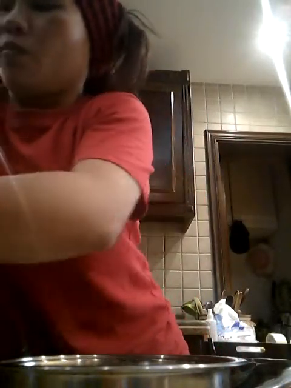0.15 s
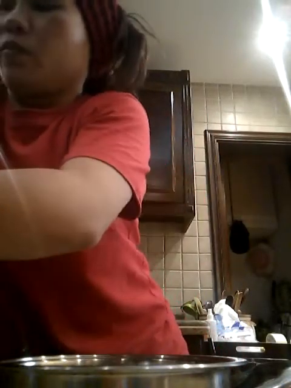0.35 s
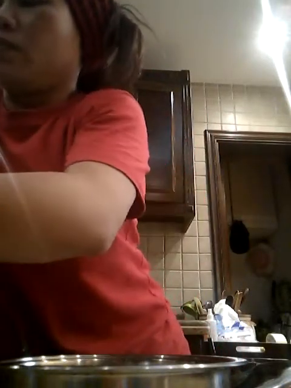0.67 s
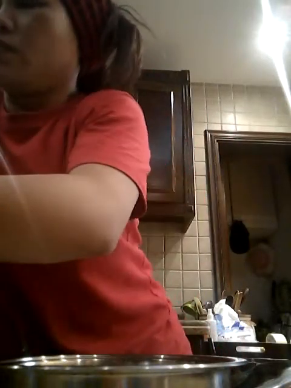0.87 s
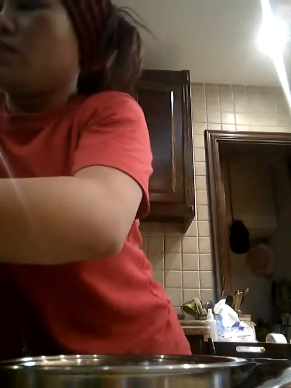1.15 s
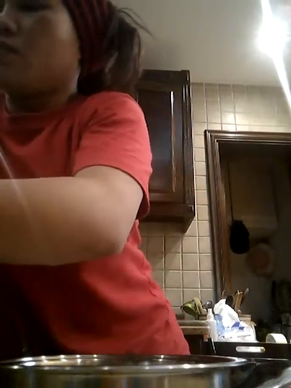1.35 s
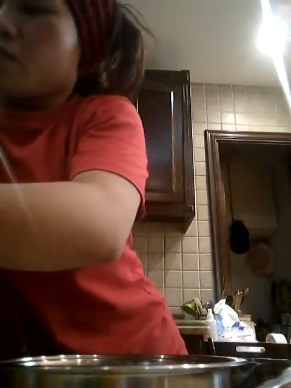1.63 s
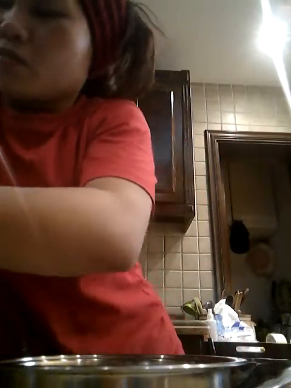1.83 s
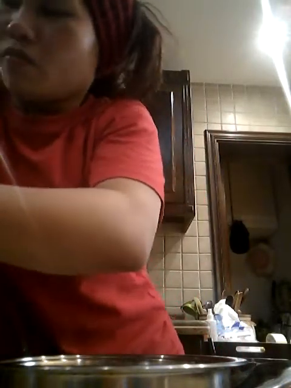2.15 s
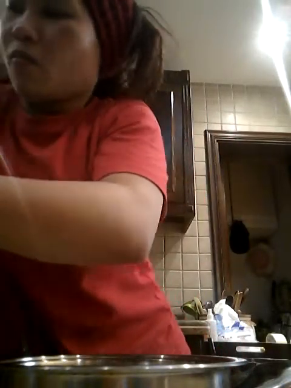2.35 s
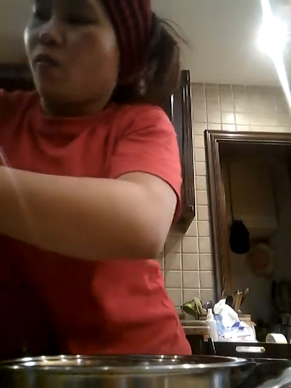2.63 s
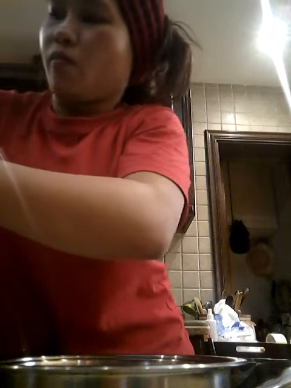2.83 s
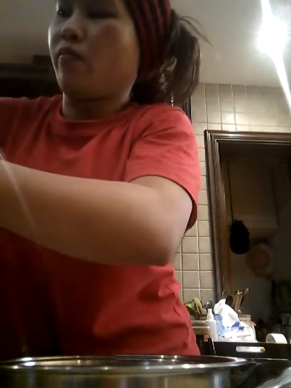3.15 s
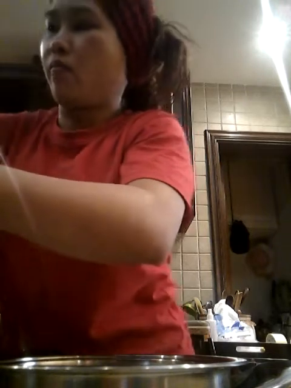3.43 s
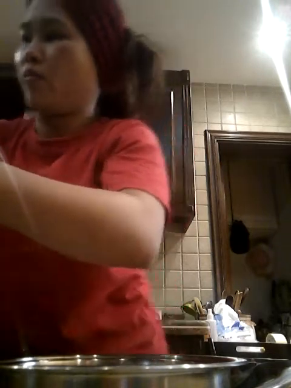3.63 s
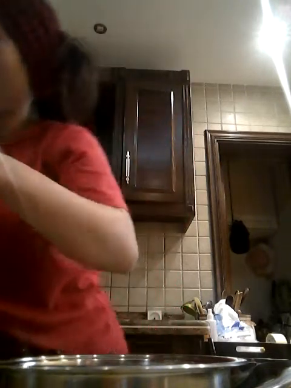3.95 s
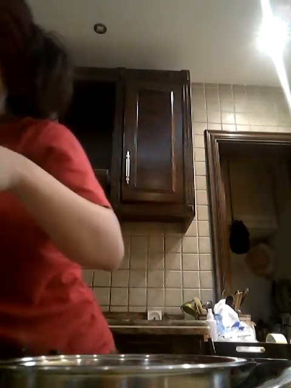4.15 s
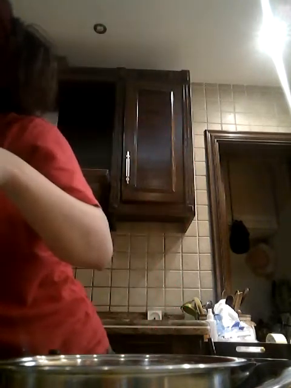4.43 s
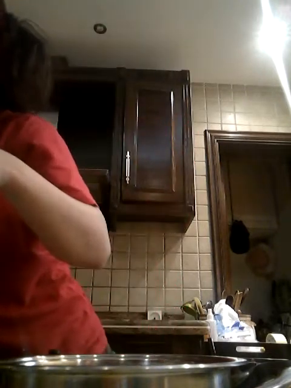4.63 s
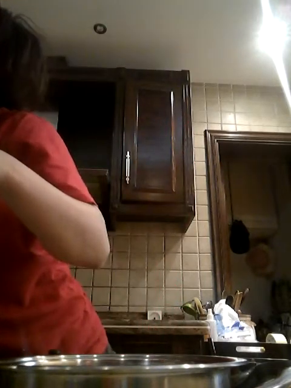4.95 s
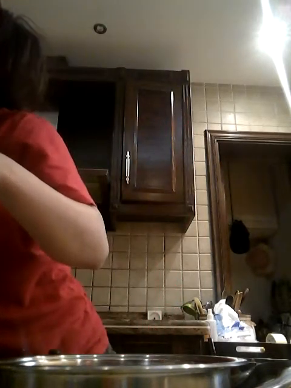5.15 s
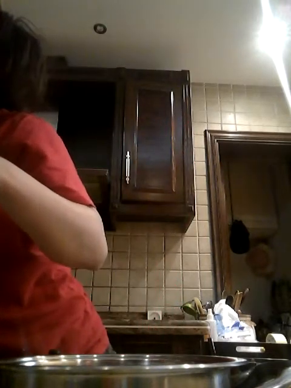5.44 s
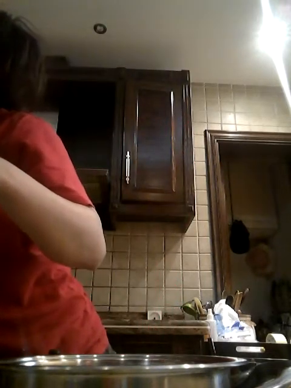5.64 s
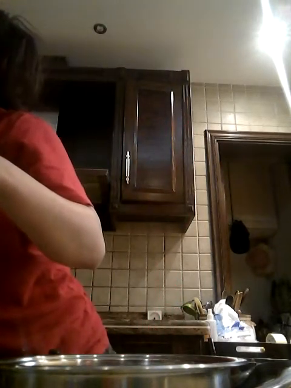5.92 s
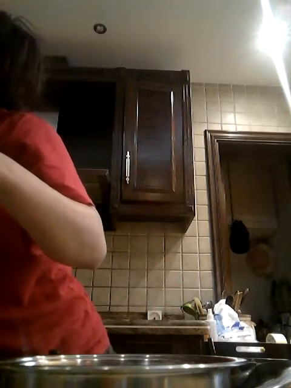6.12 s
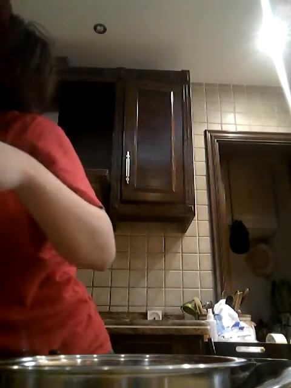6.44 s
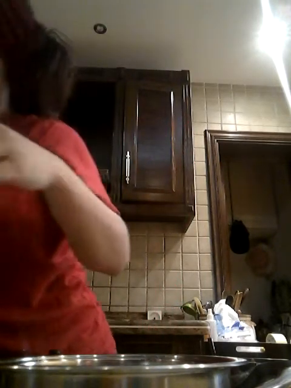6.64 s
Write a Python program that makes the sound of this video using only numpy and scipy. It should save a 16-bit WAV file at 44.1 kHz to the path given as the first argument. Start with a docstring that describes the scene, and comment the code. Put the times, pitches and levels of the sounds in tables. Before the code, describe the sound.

Close steel clinks, dry rustling scoops and dull knocks in a tiled kitchen, with a thin pot wall briefly singing after harder blows.

```python
"""A steel cup in a small tiled kitchen, over a soft low rumble, faint whines and hiss (shaped noise).
Dry goods rustle in the sliding cup (patchy noise and a narrow-band hum). Early on, ringing taps and dry clacks
alternate, then come dense metallic clinks and clacks (damped modes and a noise burst); dull knocks are further off.
After some blows the pot's thin wall sings on in beating modes, and a spoon jolts once (bright modes).
Late on, two stronger dull knocks stand out."""
import sys
import numpy as np
from scipy import signal
from scipy.fft import rfft, irfft, next_fast_len
from scipy.io import wavfile
from scipy.ndimage import uniform_filter1d

SR = 44100
rng = np.random.default_rng(int(sys.argv[2]) if len(sys.argv) > 2 else 0)


def dump(signal):
    """Clip the signal to [-1, 1] and save it as 16-bit WAV at the path in sys.argv[1]."""
    limited = np.clip(np.atleast_2d(signal).T, -1, 1)
    pcm = np.round(limited * 32767).astype(np.int16)
    wavfile.write(sys.argv[1], SR, pcm)


N = 298998  # samples


def amp(db):
    """Level to amplitude: 20 dB is a factor of ten."""
    return 10 ** (np.asarray(db) / 20)


def unit(x):
    """Normalisation: scale x to an rms of 1."""
    return x / np.sqrt(np.mean(x ** 2) + 1e-20)


def along(points, hz):
    """Logarithmic pitch scale: interpolate (frequency [Hz], value) points on a log axis."""
    point_hz, values = np.transpose(points)
    return np.interp(np.log(hz + 1), np.log(point_hz + 1), values)


def filtered(x, response):
    """Linear filtering: multiply the spectrum of x by a response of frequency."""
    size = next_fast_len(N + 8192)
    spectrum = rfft(x, size) * response(np.fft.rfftfreq(size, 1 / SR))
    return irfft(spectrum, size)[..., :N]


def noise(spectrum, patchy_db):
    """Coloured noise: a random signal with patches of random gain in time and frequency, at rms 1."""
    cells = signal.stft(rng.standard_normal(N + 512), nperseg=512)[2]
    patches = uniform_filter1d(rng.standard_normal(cells.shape), 5, 0)
    patches = unit(uniform_filter1d(patches, 8, 1))
    patchy = signal.istft(cells * amp(patchy_db * patches), nperseg=512)[1][:N]
    return unit(filtered(patchy, lambda hz: amp(along(spectrum, hz))))


def narrow(bands):
    """Resonance: noise in (centre [Hz], width [Hz], level [dB]) bands, each at its own rms level."""
    def response(f):
        total = 0
        for hz, width, db in bands:
            rms_gain = np.sqrt(SR * width / np.pi) / 2 / np.sqrt(2)
            total = total + amp(db) * rms_gain / (width / 2 + 1j * (f - hz))
        return total
    return filtered(rng.standard_normal(N), response)


def ring(hz, db, t60, seconds, rise, swell=1):
    """Modal decay: exponentially damped sines, at slightly new strengths for every blow."""
    t = np.arange(int(seconds * SR)) / SR
    db = db + 1.5 * rng.standard_normal(len(hz))
    decay_db = -60 * t / np.maximum(t60, .003)[:, None]
    modes = amp(db[:, None] + decay_db) * np.sin(2 * np.pi * np.outer(hz, t))
    onset = 1 - np.exp(-t / max(rise, 1e-4))
    return (modes * swell).sum(0) * onset


# Reverberation of the tiled kitchen: (frequency [Hz], t60 [s])
KITCHEN_DECAY = [(150, 0.17), (600, 0.36), (1500, 0.34), (4000, 0.39), (8000, .3), (14000, 0.23)]


def add(out, s, sound, room_db):
    """Room response: decaying diffuse noise; the source moves, so each answer is new."""
    hz, t, cells = signal.stft(rng.standard_normal(SR // 2), SR, nperseg=256)
    decay_db = -60 * t / along(KITCHEN_DECAY, hz)[:, None]
    tail = signal.istft(cells * amp(decay_db), SR, nperseg=256)[1]
    # echoes thicken over the first milliseconds
    tail = tail * (1 - np.exp(-np.arange(len(tail)) / (0.0033 * SR)))
    heard = amp(room_db) * signal.fftconvolve(sound, tail / np.linalg.norm(tail))
    heard[:len(sound)] += sound
    part = out[round(s * SR):][:len(heard)]
    part += heard[:len(part)]


# Course of the low rumble, swelling with the room's low boom around the hits: (time [s], level [dB])
RUMBLE_COURSE = [(0.0, -65.5), (0.34, -62), (0.73, -61.5), (1.02, -58.5), (1.75, -57), (2.08, -64),
                 (2.5, -65), (2.66, -49.5), (3.44, -49.5), (3.52, -54), (3.91, -61.5), (4.148, -66.5),
                 (4.21, -52), (4.36, -41), (4.65, -63), (5.5, -65), (5.85, -61.5), (6.78, -64)]
# Colour of the low rumble: (frequency [Hz], relative level per Hz [dB])
RUMBLE_COLOUR = [(15, -59), (25, -34), (102, -6), (143, -22), (167, -5.5), (261, -5), (295, -9.5),
                 (394, -7), (422, -10), (1500, -22.5), (1950, -54), (3300, -120)]
# Colour of the hiss: (frequency [Hz], relative level per Hz [dB])
HISS_COLOUR = [(530, -26), (900, -0.5), (1050, -13), (1770, -14), (1900, -6.5), (2330, -7), (2960, -10.5),
               (3470, -9.5), (3770, -16), (6030, -18.5), (6560, -15), (7680, -20.5), (16000, -20.5)]
# Faint steady whines: (frequency [Hz], width [Hz], level [dB])
WHINE_BANDS = [(3460, 30, -80), (6330, 250, -80.5)]


def background():
    """Stationary and modulated noise: a soft low rumble that swells, faint whines and steady hiss."""
    times, levels_db = np.transpose(RUMBLE_COURSE)
    rumble_gain = amp(np.interp(np.arange(N) / SR, times, levels_db))
    rumble = rumble_gain * noise(RUMBLE_COLOUR, patchy_db=1)
    hiss = amp(-73.5) * noise(HISS_COLOUR, patchy_db=-1.3)
    return rumble + hiss + narrow(WHINE_BANDS)


# Swishes of dry goods as the cup slides:
# (time of peak [s], rustle level [dB], hum level [dB], rise per 20 dB [s], fall per 20 dB [s])
SLIDES = [(.05, -72, -72.5, .5, 0.65), (.38, -65.5, -76.5, 0.3, 0.52), (.7, -64, -62, .25, 0.13),
          (0.802, -66, -60.5, 0.086, 0.32), (1.0, -51, -66.5, 0.0092, 0.18), (1.6, -67.5, -70.5, .45, 0.74),
          (1.86, -58.5, -70.5, .3, 0.25), (2.28, -62, -73, .12, 0.19), (2.45, -67, -66.5, 0.071, .9),
          (3.15, -48, -55.5, 0.39, 0.19), (3.4, -63.5, -66.5, 0.48, 2.2), (3.858, -61.5, -73.5, .2, 0.08),
          (4.18, -50, -55, 0.028, 0.41), (5.649, -61, -65, .07, 0.35), (5.79, -63.5, -75, 0.15, 0.065),
          (5.92, -63.5, -85.5, .08, 0.38), (6.519, -72.5, -89.5, .25, 1.5)]
# Colour of the sliding grains: (frequency [Hz], relative level per Hz [dB])
GRAIN_COLOUR = [(800, -39), (2000, -11), (4000, -4.5), (6000, -6), (7800, -2), (10000, -12.5),
                (12500, -17.5), (16000, -31.5)]


def rustle():
    """Friction noise: grains slide on steel, and the sliding cup hums faintly on its own modes."""
    time = np.arange(N) / SR
    swells = []
    for peak, _, _, rise, fall in SLIDES:
        swells.append(amp(-20 * np.maximum((peak - time) / rise, (time - peak) / fall)))
    # overlapping slides add in power
    powers = amp(np.transpose(SLIDES)[1:3]) ** 2
    rustle_gain, hum_gain = np.sqrt(powers @ np.array(swells) ** 2)
    # uneven grain strikes
    strikes_db = np.minimum(4 * rng.exponential(size=N // 40 + 1), 12)
    grains = uniform_filter1d(amp(strikes_db).repeat(40)[:N], 30)
    hiss = unit(noise(GRAIN_COLOUR, patchy_db=1.5) * (1 + .15 * grains))
    hum = unit(narrow([(1490, 14, 2.5), (2340, 29, -5.5), (4500, 36, -7.0), (6100, 80, -10.0), (8340, 80, -7.5)]))
    return rustle_gain * hiss + hum_gain * hum


def crash(colour, t60):
    """Modal overlap: the contact's many short-lived modes blur into a burst of coloured noise."""
    size = SR // 10
    spectrum = rfft(rng.standard_normal(size)) * amp(along(colour, np.fft.rfftfreq(size, 1 / SR)))
    return irfft(spectrum) * amp(-60 * np.arange(size) / SR / t60)


# Modes of the worktop: (frequency [Hz], relative level [dB], t60 [s])
WORKTOP_MODES = [(136, -12, 0.042), (195, 0, 0.06), (241, -6, 0.13), (297.4, 7, 0.05), (374, -2.5, 0.15),
                 (622, -5.5, 0.015)]
# Centres of the upper mode families of the cup: (frequency [Hz])
FAMILY_CENTRES = [2400, 3300, 4400, 6000, 8100, 10500]


def clatter(contacts, modes, family_db, ring_db, ring_loss, crash_t60):
    """Impact excitation: contact hardness tilts the upper modes, the spot struck sets the middle family."""
    out = np.zeros(N)
    hz, db, share = np.transpose(modes)
    low_hz, low_db, low_t60 = np.transpose(WORKTOP_MODES)
    octaves = np.log2(np.array(FAMILY_CENTRES) / 4400)
    for s, thud_db, clunk_db, bowl_db, upper_db, tilt_db, spot_db, damping, crash_db in contacts:
        families_db = upper_db + tilt_db * octaves + family_db + spot_db * (octaves == 0)
        upper = list(zip(FAMILY_CENTRES, families_db))
        top_db = families_db[-1]
        struck_db = along([(880, clunk_db), (1500, bowl_db)] + upper, hz)
        struck_db = struck_db + (ring_db - ring_loss * crash_db) * (hz > 2000)
        contact = ring(hz, db + struck_db, share * damping, .3, rise=.0001)
        # the worktop thuds below
        contact[:len(contact) // 2] += ring(low_hz, low_db + thud_db - 6, low_t60, .15, rise=0.0002)
        colour = [(200, clunk_db - 21.0), (800, clunk_db + 12.5)] + upper
        colour = colour + [(12000, top_db - 15.0), (16000, top_db - 19)]
        contact[:SR // 10] += amp(crash_db) * crash(colour, crash_t60)
        add(out, s, contact, room_db=-2.5)
    return out


# Ringing taps: (time [s], worktop thud [dB], clunk [dB], bowl mode [dB], upper modes [dB],
# their tilt [dB per octave], extra of the 4.4 kHz family for the spot struck [dB], damping time [s],
# crash relative to its colour [dB]); the levels are relative
RINGING_TAPS = [(0.1946, -35, -58, -58, -39.5, -0.3, -9, 0.025, 0),
                (0.403, -43, -70, -56.5, -46.5, 1.1, -12, 0.059, 5),
                (0.4486, -81, -73, -73, -58, 5, -11, 0.04, 8),
                (0.4848, -73, -72, -71, -56.5, -0.5, -6, 0.057, -8),
                (0.6589, -84, -47.5, -70, -65, -1, -4, 0.05, 6),
                (0.793, -64, -53, -60, -63, 7.5, 2, 0.043, 14),
                (0.832, -48, -64, -56, -60, 5, 2, 0.037, 10.5),
                (0.9921, -35, -19.5, -19, -26, -1.3, 2.5, 0.03, -5),
                (1.323, -35, -21, -8.5, -18.5, -5.5, 2.5, 0.069, 1),
                (1.4061, -35.5, -24, -10, -13.5, -3.5, -0.94, 0.049, -3.5),
                (2.4285, -59.5, -67, -60, -68, -0.8, -3.3, 0.046, -12)]
# Modes of the tapping cup: (frequency [Hz], relative level [dB], share of the damping time [1])
TAP_MODES = [(954, -3.5, .45), (1451, 3.5, 1.38), (2385, 2, 0.29), (2374, -0.5, 0.82), (3020, -1, 0.73),
             (3287, 1.5, 0.45), (4306, 4, 0.49), (6040, 7, 0.38), (7476, -7, 0.45), (8020, 4, 0.3),
             (8670, -5.5, 0.53), (10150, -4.5, .5), (13300, -9, .8)]
# How readily each mode family answers a tap: (relative level [dB])
TAP_FAMILIES = [1.5, -3, 2, 0, 0.5, -8.5]


def taps():
    """Damped free vibration: the hand-held cup rings cleanly at each tap."""
    return clatter(RINGING_TAPS, TAP_MODES, TAP_FAMILIES, ring_db=-0.4, ring_loss=0, crash_t60=.016)


# Dry clacks early, then dense clinks and clacks: (time [s], worktop thud [dB], clunk [dB], bowl mode [dB],
# upper modes [dB], their tilt [dB per octave], extra of the 4.4 kHz family for the spot struck [dB],
# damping time [s], crash relative to its colour [dB]); the levels are relative
CLINKS_AND_CLACKS = [(0.5898, -71.5, -79, -70, -54.5, -2, -1, 0.031, 7.7),
                     (1.1591, -43, -47.5, -52.5, -54, -4.5, -4, 0.032, 5),
                     (1.8197, -44, -52, -73.5, -38.5, 4.5, -2.5, 0.036, 7),
                     (2.4662, -53, -68.5, -65, -69, 6, -6, 0.023, 8),
                     (2.522, -21.5, -26, -8.5, -22, -8.5, -6.5, 0.076, 5.6),
                     (2.5701, -29.5, -20, -12.5, -34.5, -4, 2.5, 0.09, 4.2),
                     (2.7159, -33.5, -25.5, -19, -22.5, 0.7, 7.5, 0.075, 7),
                     (2.7266, -29.5, -25.5, -17, -26, -0.1, 5.5, 0.071, 7),
                     (2.7448, -45, -32.5, -32, -27.5, 4.5, 5.5, 0.059, 7.7),
                     (2.8, -45, -36.5, -34, -35.5, 2, 6, 0.025, 6.5),
                     (2.884, -45, -44, -49, -41, -9, -8, 0.031, 5.9),
                     (2.9698, -30.5, -28, -18, -25, 2.3, -2, 0.054, 5.5),
                     (2.9939, -25, -29, -26.5, -19.5, 1.1, 4.5, 0.031, 7),
                     (3.129, -52.5, -30, -37, -43, -2.5, -8.5, 0.13, 2.3),
                     (3.152, -35, -28.5, -32.5, -39.5, -1.6, -9.5, 0.055, 1.58),
                     (3.2887, -18.5, -29.5, -11.5, -21, 7, -0.2, 0.062, 1.5),
                     (3.299, -21, -34, -9.5, -21.5, 0, -3, 0.098, 3),
                     (3.317, -27.5, -30.5, -22, -27.5, -0.4, 8.5, 0.098, 4),
                     (3.4945, -10.5, -15.5, -13.5, -22.5, 3, -9, 0.043, 3.1),
                     (3.5159, -27.5, -34, -15.5, -29.5, 3.5, -5, 0.09, 2.57),
                     (4.1661, -52, -36.5, -36, -36, -1.5, 1, 0.03, 8.3),
                     (4.1741, -44, -37.5, -45.5, -39, 3.5, 1.5, 0.015, 3.9),
                     (4.1951, -32, -35, -58, -39, -2, 2.1, 0.088, 1.9),
                     (4.2108, -30, -25, -14.5, -32.5, -6.5, -4, 0.04, 5.7),
                     (4.286, -30.5, -30, -20, -35, -11, 1, 0.1, 6.1),
                     (4.2968, -60, -41, -12.5, -38, -7, 4, 0.039, 7.2),
                     (4.3184, -68, -77, -11, -37.5, -7, -0.4, 0.046, 3.9),
                     (5.7724, -51, -64, -69.5, -59.5, 8.5, 0, 0.017, 5.4)]
# Modes of the clinking metal: (frequency [Hz], relative level [dB], share of the damping time [1])
CLINK_MODES = [(730, -16.5, 0.9), (930, 0.5, 0.41), (1461.4, 2, 1.1), (1570, -10.5, 2.7),
               (2257.5, -2.5, 0.85), (2356, 0, 0.44), (2580, -1.5, 0.39), (3279, 4, 0.27),
               (3720, -1, 0.092), (4420, -1.5, .6), (4448, 0.5, 0.18), (4680, -4, 0.17), (5550, 3.5, 0.34),
               (6380, 0.5, 0.44), (7930, -2, 0.36), (8010, 2.5, .5), (8380, -3, 0.47), (9630, -2.5, .4),
               (10335, -13, 0.46), (13220, -9.5, .4)]
# How readily each mode family answers a clink: (relative level [dB])
CLINK_FAMILIES = [-0.54, 1.35, 1.5, -5.5, 1.5, -9]


def clinks():
    """Contact damping: rougher than the taps, they lose .9 dB of upper ring per dB of crash."""
    return clatter(CLINKS_AND_CLACKS, CLINK_MODES, CLINK_FAMILIES, ring_db=2.74, ring_loss=.9, crash_t60=.032)


# Dull knocks: (time [s], level [dB], brightness, 2/3 of the low-pass cutoff [Hz], relative rattle level [dB])
DULL_KNOCKS = [(1.507, -23, 196, -58), (1.823, -39, 151, -60.5), (2.03, -40.5, 420, -50),
               (4.6, -34, 303, -59.5), (5.166, -39.5, 550, -53), (5.513, -38, 198, -59),
               (5.606, -38.5, 575, -43.5), (5.631, -17, 575, -39), (5.907, -21.5, 1950, -26.5)]
# Modes of the shelf: (frequency [Hz], relative level [dB], t60 [s])
SHELF_MODES = [(109, -11.5, 0.028), (400, -4.5, 0.018), (628, 0, 0.013), (785, -0.8, .015),
               (1020, 0.5, .02), (1552, 1.9, 0.027), (2250, -5.5, 0.019), (2740, -6.5, 0.013),
               (3220, -7, 0.017)]
# Modes of the crockery: (frequency [Hz], relative level [dB], t60 [s])
CROCKERY_MODES = [(4470, 4.5, 0.03), (5570, -3, .03), (7870, -8, .03), (8750, -12, 0.034)]


def knocks():
    """Contact duration as a low-pass: a slow push reaches only the low modes; crockery rattles along."""
    out = np.zeros(N)
    hz, db, t60 = np.transpose(SHELF_MODES)
    china_hz, china_db, china_t60 = np.transpose(CROCKERY_MODES)
    for s, knock_db, bright_hz, rattle_db in DULL_KNOCKS:
        wood = ring(hz, db + knock_db, t60, .1, rise=0.00047)
        soft_contact = signal.butter(4, 1.5 * bright_hz, fs=SR, output="sos")
        wood = signal.sosfilt(soft_contact, wood)
        china = ring(china_hz, china_db + knock_db + rattle_db, china_t60, .1, rise=0.00034)
        add(out, s, wood + china, room_db=1.5)
    return out


# Blows that set the free pot singing: (time [s], relative level [dB], tilt [dB per octave],
# time until it is touched [s], pace of the beating [1])
SINGING_BLOWS = [(3.30, -40.5, -13, 0.13, 1.2), (3.50, -44.5, 3, 0.49, 2.5), (4.29, -41.5, -8.5, 0.18, 1.3)]
# Modes of the thin wall: (frequency [Hz])
POT_MODES = [2264, 3569, 5295, 6135, 7286, 8513, 11330]
# Close pair at each mode: (relative level [dB], t60 while free [s], beat rate at pace 1 [Hz])
POT_PAIRS = [(-2, 1.3, 2.6), (-0.8, 1.5, 2.2), (0.5, 1.3, 4.1), (3.5, .45, 6), (-0.5, 1.1, 3.6),
             (-5, .51, 8), (-9.5, .3, 9)]


def pot():
    """Beating of near-degenerate modes: pairs start nearly opposed, so the tone swells until a touch stills it."""
    out = np.zeros(N)
    db, t60, beat = np.transpose(POT_PAIRS)
    octaves = np.log2(np.array(POT_MODES) / 4000)
    t = np.arange(int(.9 * SR)) / SR
    for s, blow_db, tilt_db, free, pace in SINGING_BLOWS:
        swell = .3 + np.sin(np.pi * np.outer(pace * beat, t))
        touch = amp(-60 * np.maximum(t - free, 0) / 0.21)
        level_db = db + blow_db + tilt_db * octaves
        add(out, s, ring(POT_MODES, level_db, t60, .9, .003, swell * touch), room_db=-14)
    return out


# Jolt of the spoon: (time [s], relative level [dB])
SPOON_JOLT = (3.515, -24.5)
# Modes of the spoon: (frequency [Hz])
SPOON_MODES = [2644, 4474, 6422, 8515, 9244, 11720, 11978]
# Decay of each mode: (relative level [dB], t60 [s])
SPOON_DECAY = [(-18.5, 0.48), (-1.5, 0.4), (-12, 0.54), (-11, 0.26), (3.5, 0.27), (-13.5, 0.25), (-8, .17)]


def spoon():
    """Free vibration of a light metal body: one bright jolt rings in high damped modes."""
    out = np.zeros(N)
    s, jolt_db = SPOON_JOLT
    db, t60 = np.transpose(SPOON_DECAY)
    add(out, s, ring(SPOON_MODES, db + jolt_db, t60, 0.48, rise=0.00197), room_db=-16.0)
    return out


def scene():
    """Superposition: the pressures of all sources add at one microphone."""
    ambience = background() + rustle()
    cup = taps() + clinks()
    return (ambience + cup + knocks() + pot() + spoon())[None]


def record(dry):
    """Transducer limits: the small microphone loses deep bass, the preamp adds noise and rounds peaks."""
    bass_cut = signal.butter(6, 104, "high", fs=SR, output="sos")
    thin = signal.sosfilt(bass_cut, dry)
    thin = thin + amp(-77.5) * rng.standard_normal(dry.shape)
    rounded = thin / (1 + np.abs(thin / .96) ** 8) ** (1 / 8)
    return filtered(rounded, lambda hz: hz < 15800)  # the band ends sharply


dry = scene()
out = record(dry)
dump(out)
```